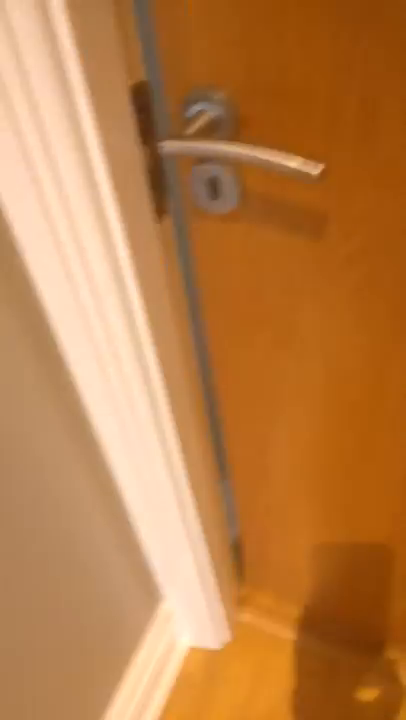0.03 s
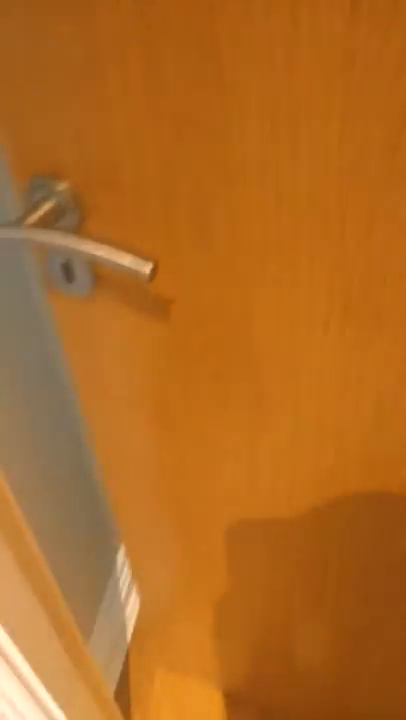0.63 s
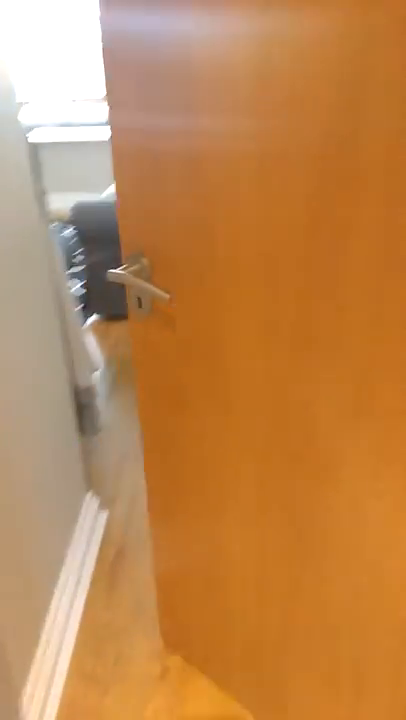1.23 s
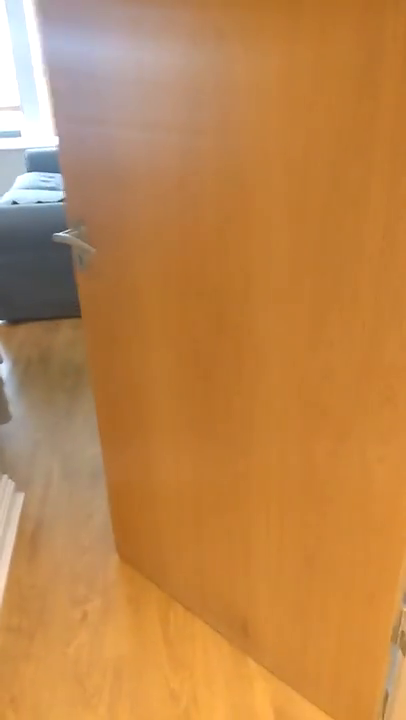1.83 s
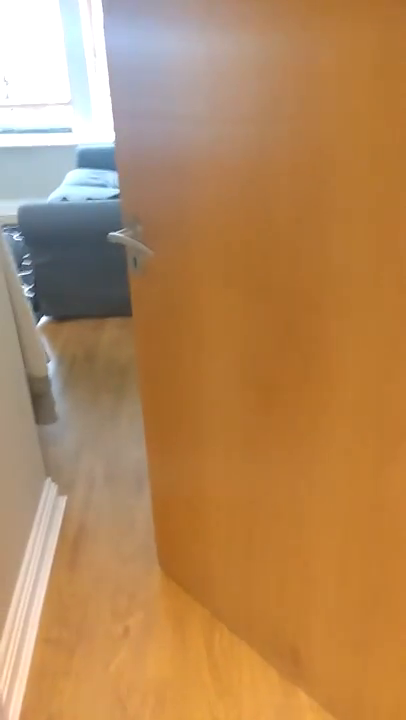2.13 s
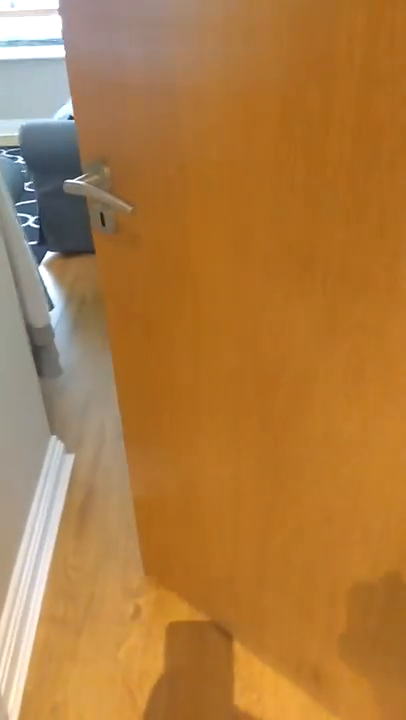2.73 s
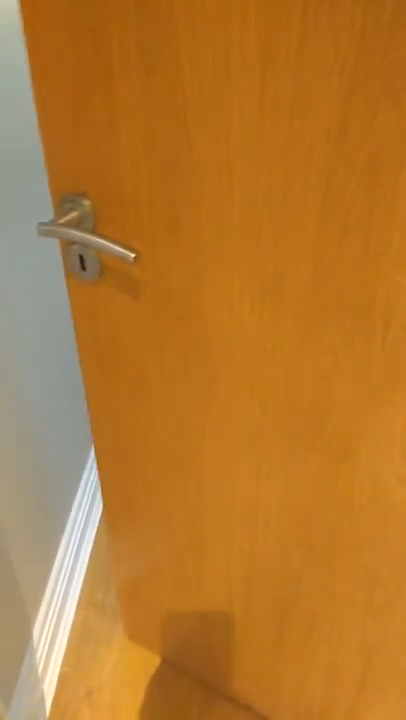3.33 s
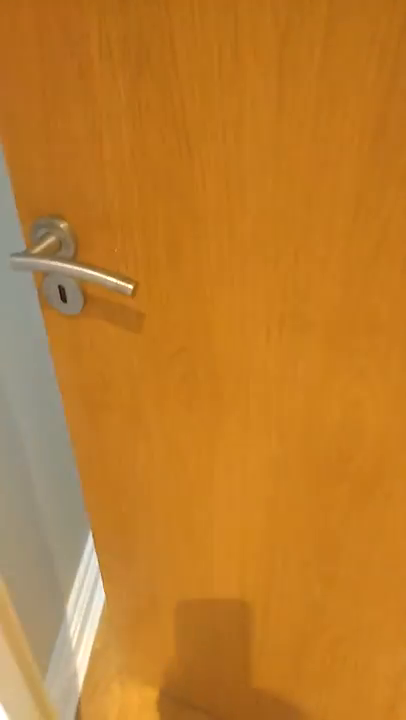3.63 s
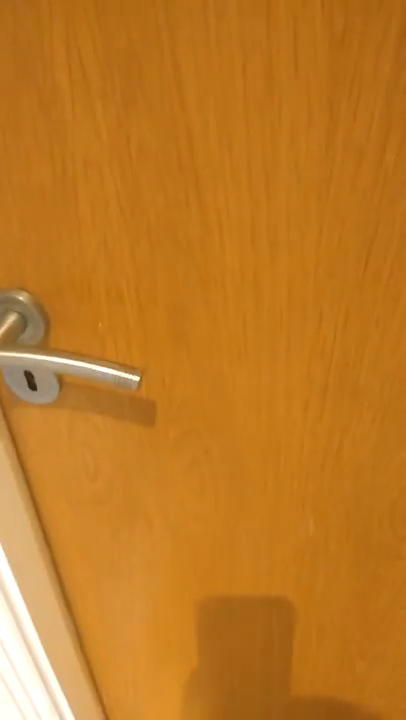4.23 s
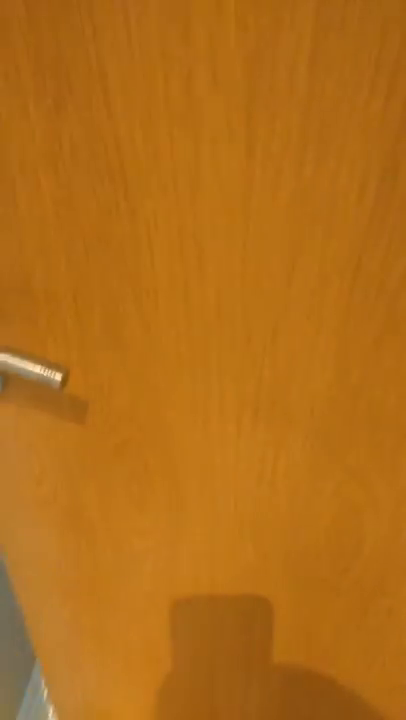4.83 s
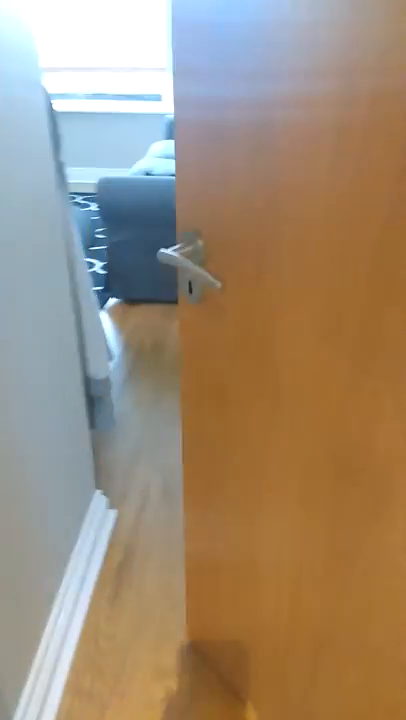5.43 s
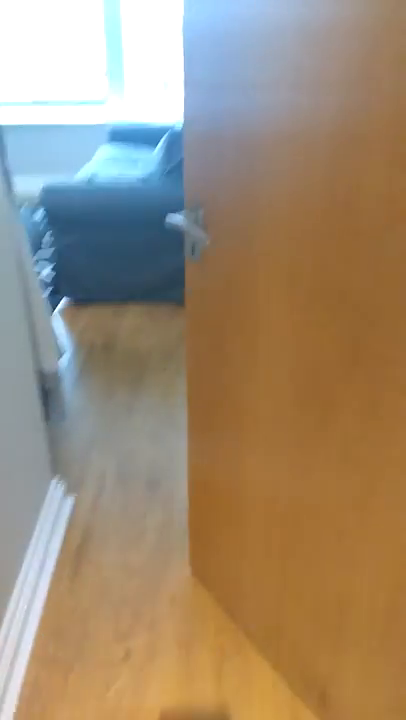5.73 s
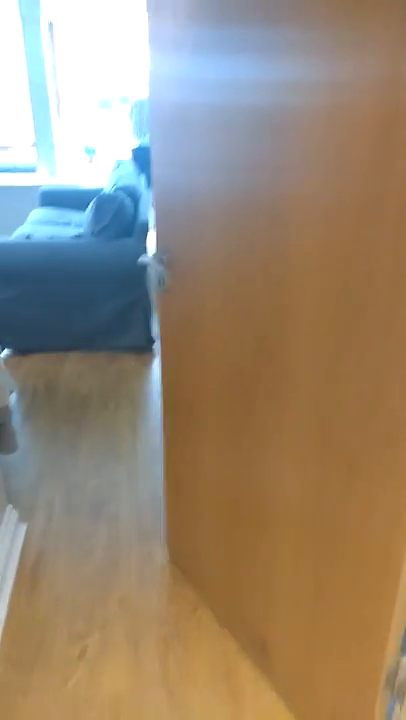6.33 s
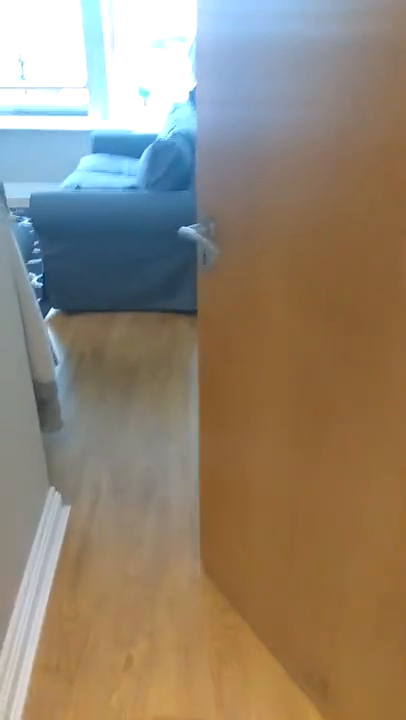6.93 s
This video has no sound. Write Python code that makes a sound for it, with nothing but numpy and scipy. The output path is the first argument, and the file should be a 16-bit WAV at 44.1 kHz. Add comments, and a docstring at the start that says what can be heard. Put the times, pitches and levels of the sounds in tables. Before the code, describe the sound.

In a quiet hallway, a door handle clicks and the wooden door knocks lightly. Its dry hinge gives a squeal that falls into a slow rattle. The door is pulled shut with a sharp latch snap, then clicks open and creaks again the same way. A faint appliance hum sits behind it, dropping while the door is closed. A sleeve swishes softly, and fingers bump the hand-held microphone around the second creak.

```python
"""An appliance hums beyond a wooden hallway door. The handle clicks, the door is pushed open, and its dry
hinge sticks and slips: a squeal that falls into a rattle as the door slows. Near 4 s the door is pulled
shut with a puff of air, the latch snaps and the hum grows fainter. A second later the latch clicks again,
the hum returns and the hinge creaks once more while fingers bump the hand-held camera.
A sleeve swishes now and then throughout."""
import sys
import numpy as np
from scipy import signal
from scipy.fft import rfft, irfft, next_fast_len
from scipy.io import wavfile
from scipy.ndimage import uniform_filter1d, map_coordinates

SR = 44100
rng = np.random.default_rng(int(sys.argv[2]) if len(sys.argv) > 2 else 0)


def write(x):
    x = np.atleast_2d(x).T
    wavfile.write(sys.argv[1], SR, np.round(np.clip(x, -1, 1) * 32767).astype(np.int16))


N = 313110
NOW = np.arange(N) / SR


def amp(db):
    """Decibels to gain."""
    return 10 ** (np.asarray(db) / 20)


def unit(x):
    """Scale to rms 1."""
    return x / np.sqrt(np.mean(x ** 2) + 1e-20)


def along(points, hz):
    """Read (Hz, value) points on a log frequency axis."""
    f, v = np.transpose(points)
    return np.interp(np.log(hz + 1), np.log(f + 1), v)


def curve(points):
    """Join (seconds, value) points into one value per sample."""
    return np.interp(NOW, *np.transpose(points))


def wobble(rate):
    """A smooth random curve, rate knots a second."""
    return map_coordinates(rng.standard_normal(int(N * rate / SR) + 4), [NOW * rate])


def filtered(x, response):
    """Filter x by a complex response of frequency."""
    n = x.shape[-1]
    m = next_fast_len(n + SR // 8)
    return irfft(rfft(x, m) * response(np.fft.rfftfreq(m, 1 / SR)), m)[..., :n]


def eq(x, points):
    """Colour x with a curve of (Hz, dB) points."""
    return filtered(x, lambda f: amp(along(points, f)))


def resonance(f, hz, width):
    """Response of one damped mode."""
    return 1j * f * width / (hz * hz - f * f + 1j * f * width)


def add(track, s, x):
    """Mix x into the track at s seconds."""
    part = track[..., round(s * SR):][..., :x.shape[-1]]
    part += x[..., :part.shape[-1]]


# Stereo image of diffuse sound. Each row: frequency in Hz, left-right correlation.
STEREO_LIKENESS = [(60, 0.18), (130, 0.11), (290, 0.14), (640, 0.78), (1400, 0.93), (3000, 0.81),
                   (8000, 0.81), (14000, 0.06)]

def mid_side(f):
    """Mid and side gains that make noise partly alike in both ears."""
    angle = np.arccos(np.clip(along(STEREO_LIKENESS, f), -1, 1)) / 2
    return np.array([np.cos(angle), np.sin(angle)])


def stereo_noise(colour):
    """Diffuse noise of rms 1, coloured by (Hz, dB) points."""
    mid, side = filtered(rng.standard_normal((2, N)), lambda f: amp(along(colour, f)) * mid_side(f))
    return unit(np.array([mid + side, mid - side]))


# The hallway's tail. Each row: frequency in Hz, t60 in seconds.
HALL_DECAY = [(150, 0.71), (600, 0.69), (1500, 0.67), (4000, 0.74), (8000, 0.68), (13000, 0.35)]

def hallway(x, tail_db, walls_db, walls_t60=0.09):
    """Direct sound, scattered echoes of the close walls and a longer tail."""
    hz, t, noise = signal.stft(rng.standard_normal((2, SR * 3 // 4)), SR, nperseg=256)
    noise = noise * mid_side(hz)[..., None]

    def decay(db, t60):
        wash = signal.istft(noise * amp(-60 * t / t60), SR, nperseg=256)[1]
        return amp(db) * wash / np.linalg.norm(wash)
    mid, side = decay(tail_db, along(HALL_DECAY, hz)[:, None]) + decay(walls_db, walls_t60)
    echoes = np.pad([mid + side, mid - side], ((0, 0), (SR // 300, 0)))  # pre-delay
    x = np.atleast_2d(x)
    return x + signal.fftconvolve(x, echoes, axes=1)[:, :N]


# The bed of air. Each row: frequency in Hz, relative level in dB.
AIR_COLOUR = [(20, -49), (44, -6), (70, -15), (110, -10), (150, -2), (240, -5.5), (340, -10), (700, -9),
              (1500, -14.5), (2500, -18.5), (3600, -22), (5000, -27.5), (9000, -37.5), (15000, -40)]
# The appliance's tones. Each row: pitch in Hz, relative level in dB.
HUM_TONES = [(100.2, -48.5), (155, -49.5), (200, -54), (243, -49.5), (296, -56), (565.2, -52), (684, -53.5)]

def room_beyond(open_db=-37.5, shut_db=-46.5, shut_at=4.04, shutting_s=0.22, open_at=4.9, opening_s=0.89):
    """Air noise and a slightly unsteady appliance hum, both fainter while the door is shut."""
    hum = np.zeros((2, N))
    for hz, db in HUM_TONES:
        phase = 2 * np.pi * hz * NOW + 0.2 * wobble(7)
        hum += amp(db + 1.8 * wobble(6)) * np.sin(phase + np.array([[.4], [-.4]]))
    air = amp(-2.5 + 0.64 * wobble(9)) * stereo_noise(AIR_COLOUR)
    shut = np.clip((NOW - shut_at) / shutting_s, 0, 1) - np.clip((NOW - open_at) / opening_s, 0, 1)
    return amp(open_db + (shut_db - open_db) * shut) * (air + amp(39) * hum)


# Sleeve swishes. Each row: time of the peak in seconds, level in dB.
SWISHES = [(.02, -48), (.76, -45), (1.47, -48), (3.05, -52.5), (5.58, -58), (6.7, -48.5)]
# The cloth's hiss. Each row: frequency in Hz, relative level in dB.
CLOTH_COLOUR = [(1500, -11), (3300, 4), (6000, -5), (9000, -5), (15000, -14)]

def sleeve(rise_db_per_s=43, fall_db_per_s=36):
    """Cloth rustle swells and fades with each move of the arm."""
    swishes = [db - np.maximum(rise_db_per_s * (s - NOW), fall_db_per_s * (NOW - s)) for s, db in SWISHES]
    return amp(np.max(swishes, axis=0)) * stereo_noise(CLOTH_COLOUR)


# The puff as the door shuts. Each row: time in seconds, level in dB.
PUFF_ENVELOPE = [(3.95, -82), (4.06, -45), (4.2, -56), (4.3, -56), (4.42, -84)]

def draught():
    """The closing leaf presses a slow rumble of air through the frame."""
    rumble = stereo_noise([(15, -18), (40, 2), (60, -3), (110, -27), (300, -64)])[0]
    return amp(curve(PUFF_ENVELOPE)) * rumble


# Shifts of the grip. Each row: start in seconds, end in seconds, tap level in dB.
GRIP_SHIFTS = [(0.664, .7, -26), (5.65, 5.83, -20), (6.223, 6.39, -21), (6.895, 6.98, -28)]

def finger_taps(per_s=36, hz=127, spread_db=0.5, spread_octaves=0.22):
    """Light taps, loosely spaced through each shift of the grip, as (seconds, dB, Hz) rows."""
    taps = []
    for start, end, db in GRIP_SHIFTS:
        times = np.arange(start, end, 1 / per_s)
        for s, (late, soft, pitch) in zip(times, rng.standard_normal((40, 3))):
            taps.append((s + late / per_s / np.pi, db - spread_db * soft, hz * 2 ** (spread_octaves * pitch)))
    return taps


# Firm bumps on the camera. Each row: time of the peak in seconds, level in dB, pitch in Hz.
FIRM_BUMPS = [(.718, -19, 102), (5.212, -21, 122), (5.687, -10, 160), (5.699, -13, 135), (5.721, -13, 237),
              (5.768, -16, 141), (6.201, -14, 155), (6.415, -7.5, 175), (6.449, -17, 151)]

def camera_bumps(cycles=0.75, grip_s=0.011):
    """Fingers flex the camera case: brief low pushes, opposite at the two ports, with a little rubbing."""
    pushes, grip = np.zeros((2, N))
    t = np.arange(-SR // 10, SR // 10) / SR
    for s, db, hz in FIRM_BUMPS + finger_taps():
        envelope = amp(db) / np.cosh(np.clip(2 * hz * t / cycles, -20, 20))
        add(pushes, s + t[0], envelope * np.cos(2 * np.pi * hz * t))
        add(grip, s + t[0], amp(db) * np.exp(-abs(t) / grip_s))
    rub = grip * stereo_noise([(25, -28), (60, -7), (130, 11), (300, -3), (600, -27), (1500, -77)])
    return (pushes + amp(-16) * rub[0]) * np.array([[.92], [-1]]) + amp(-25) * rub[1]


# Dull knocks of door and floor.
# Each row: start in seconds, level in dB, pitch in Hz, t60 in seconds, left over right in dB.
WOOD_KNOCKS = [(.049, -26.5, 380, 0.051, 0), (.415, -29, 302, 0.045, 5), (.826, -30.5, 307, 0.14, 3),
               (1.0455, -21.5, 402, 0.037, -5.5), (1.058, -25.5, 350, 0.035, 4),
               (4.027, -22.5, 331, 0.058, 3), (4.03, -32.5, 705, 0.11, 1), (4.057, -24.5, 190, 0.043, -1),
               (4.296, -41, 379, .096, 0), (5.058, -32, 870, 0.046, 1), (5.08, -33.5, 351, .08, -4),
               (5.325, -38.5, 409, .08, 1), (5.715, -28, 264, 0.076, 1), (6.411, -26, 250, 0.045, 4),
               (6.573, -28.5, 386, 0.12, 1)]

def knocks(thud_db=-5):
    """Soft blows on wood: a low mode inside a quickly dying thud."""
    out, t = np.zeros((2, N)), np.arange(SR // 3) / SR
    for s, db, hz, t60, pan_db in WOOD_KNOCKS:
        thud = unit(filtered(rng.standard_normal(len(t)), lambda f: resonance(f, hz, width=hz) ** 2))
        blow = amp(db - 60 * t / t60) * (amp(thud_db) * thud + np.sin(2 * np.pi * hz * t))
        add(out, s, blow * amp([[pan_db / 2], [-pan_db / 2]]))
    return hallway(out, tail_db=-5, walls_db=-1.5)


# Latch and handle contacts.
# Each row: start in seconds, rattle level in dB, tick level in dB, rattle t60 in seconds.
LATCH_HITS = [(0.05, -17.5, -16, 0.031), (0.446, -19.5, -46, 0.044), (0.592, -32, -59.5, 0.19),
              (0.822, -26, -48, 0.1), (3.88, -28.5, -37.5, 0.12), (4.022, -27, -45, 0.03),
              (4.144, -12, -15, 0.042), (5.056, -26.5, -41.5, 0.024)]
# The woody rattle and the bright tick. Each row: frequency in Hz, relative level in dB.
LEAF_COLOUR = [(150, -6), (500, -16.5), (850, -5.5), (1150, 2), (1500, -1.5), (1950, 0.5), (2500, -7),
               (3500, -19.5), (5000, -19.5), (9000, -51)]
STEEL_COLOUR = [(1500, -11), (3000, 2), (5200, -1.5), (6900, -4.5), (9100, -8.5), (10500, -9.5),
                (15000, -22)]

def latch(tick_t60=0.0084, rattle_rise_s=0.00045):
    """Each contact is a short steel tick, then a rattle of the door leaf's dense modes."""
    ticks, rattles = np.zeros((2, N))
    t = np.arange(SR // 3) / SR
    for s, rattle_db, tick_db, rattle_t60 in LATCH_HITS:
        steel = unit(eq(rng.standard_normal(len(t)), STEEL_COLOUR))
        wood = unit(eq(rng.standard_normal(len(t)), LEAF_COLOUR))
        add(ticks, s, amp(tick_db - 60 * t / tick_t60) * steel)
        add(rattles, s, amp(rattle_db - 60 * t / rattle_t60) * (1 - np.exp(-t / rattle_rise_s)) * wood)
    return hallway(ticks, tail_db=-8, walls_db=-3) + hallway(rattles, tail_db=-1, walls_db=-17.5)


# Ring of frame and strike plate. Each row: pitch in Hz, relative level in dB, t60 in seconds.
STRIKE_MODES = [(1190, -26, .3), (1460, -21.5, .14), (6850, -22, 0.016), (9100, -10, 0.0063)]

def bolt(start_s=4.1423):
    """The bolt springs home: the frame rings under the short bright ping of the strike plate."""
    out, t = np.zeros(N), np.arange(SR // 20) / SR
    for hz, db, t60 in STRIKE_MODES:
        add(out, start_s, amp(db - 60 * t / t60) * np.sin(2 * np.pi * hz * t))
    return hallway(out, tail_db=-19, walls_db=-18) * np.array([[2], [-2]])


def slip_rate(glide):
    """Slips per second: friction slows the door by equal ratios in equal times."""
    return np.exp(curve([(s, np.log(hz)) for s, hz in glide]))


def roughness(rate, at_rest=0.95, smoothing_hz=225):
    """Slow slips are uneven, fast ones lock into a squeal."""
    return at_rest * np.exp(-rate / smoothing_hz)


def stroke_envelope(glide, swell_db, edge_s=0.019, swell_s=0.15, stall_hz=162):
    """A stroke's shape in dB: abrupt ends, a swell as the pin bites, a fade as the hinge stalls."""
    start, end = glide[0][0], glide[-1][0]
    edge = np.clip(1 - np.minimum(NOW - start, end - NOW) / edge_s, 0, 1)
    swell = np.clip(1 - (NOW - start) / swell_s, 0, 1)
    stall_octaves = np.maximum(np.log2(stall_hz / slip_rate(glide)), 0)
    return -26 * edge - swell_db * swell - 24 * stall_octaves


def slips(glide, db, scatter=0.14, spread_db=5.5, waver=0.007):
    """One kick each time the pin lets go; slow slips vary in timing and force."""
    rate = slip_rate(glide)
    moving = (NOW > glide[0][0]) & (NOW < glide[-1][0])
    count = np.cumsum(rate * (1 + waver * wobble(70)) * moving) / SR
    due = np.interp(np.arange(1, int(count[-1])), count, np.arange(N))
    i = due.astype(int)
    late, force = roughness(rate[i]) * np.clip(rng.standard_normal((2000, 2)), -2, 2)[:len(i)].T
    period = SR / rate[i]
    at = due + scatter * late * period
    size = amp(db[i] + spread_db * force) * np.sqrt(period)
    # a windowed sinc places each kick between samples, keeping the squeal clean
    samples = at.astype(int)[:, None] + np.arange(-7, 9)
    offset = samples - at[:, None]
    kicks = size[:, None] * np.sinc(offset) * np.cos(np.pi * offset / 16) ** 2
    return np.bincount(samples.ravel(), kicks.ravel(), N)[:N]


# Resonances of hinge and leaf. Each row: pitch in Hz, width in Hz, relative level in dB.
DOOR_MODES = [(358, 127, -9), (590, 94, -7.5), (927, 232, -4.5), (1350, 188, 3), (1795, 271, 3),
              (2070, 160, -19.5), (2025, 74, -10.5), (3360, 610, -12), (3715, 415, -11), (5310, 800, -22.5)]
# What the door sends into the air. Each row: frequency in Hz, gain in dB.
DOOR_RADIATION = [(60, -30), (250, 0.5), (6500, -2.5), (9000, -13), (15000, -24)]

def door_body(f):
    """Response of hinge plate and door leaf: damped modes of alternating sign, radiated into the air."""
    modes = sum((-1) ** k * amp(db) * resonance(f, hz, width)
                for k, (hz, width, db) in enumerate(DOOR_MODES))
    return modes / np.sqrt(np.mean(abs(modes) ** 2)) * amp(along(DOOR_RADIATION, f))


# Pitch glides of the hinge. Each row: time in seconds, slips per second.
FIRST_CREAK = [(1.533, 1118), (1.615, 1080), (1.668, 950), (1.681, 860), (1.722, 808), (1.74, 645),
               (1.79, 520), (1.99, 68)]
AFTER_CREAK = [(2.115, 391), (2.165, 414)]
FAINT_SQUEAL = [(5.62, 1210), (5.72, 1177)]
SECOND_CREAK = [(5.872, 1115), (5.942, 1062), (5.956, 997), (6.01, 915), (6.09, 815), (6.112, 688),
                (6.185, 550), (6.43, 60)]
# Strokes of the hinge. Each row: glide, then in dB the relative level, swell, dry scrape,
# sizzle of the scrape, boom of the leaf and shrillness.
HINGE_STROKES = [(FIRST_CREAK, -16.5, 8.1, -22, 5.3, 0, 2.45), (AFTER_CREAK, -29.5, 0, -32, 0, 7.6, 0),
                 (FAINT_SQUEAL, -39, 0, -45, 0, 4.7, -15), (SECOND_CREAK, -18.5, 0, -23, -9, 2.14, 0)]
# The gritty scrape. Each row: frequency in Hz, gain in dB.
SCRAPE_COLOUR = [(2200, -25), (3300, 11.5), (5000, 12.5), (7000, 0.5), (9000, -2.5), (12000, -9.5),
                 (15000, -11)]

def hinge():
    """The dry hinge sticks and slips, ringing its plate and the leaf; rough, slow slips also scrape."""
    kicks, scrape = np.zeros((2, N))
    for glide, level_db, swell_db, scrape_db, sizzle_db, boom_db, shrill_db in HINGE_STROKES:
        train = slips(glide, level_db + stroke_envelope(glide, swell_db))
        kicks += eq(train, [(1150, boom_db), (1500, 0), (2500, shrill_db)])
        # every slip scrapes over fresh grains of metal for about two milliseconds
        energy = uniform_filter1d(train ** 2 * roughness(slip_rate(glide)), size=90)
        grains = np.sqrt(np.abs(energy)) * rng.standard_normal(N)
        scrape += amp(scrape_db) * eq(grains, [(5500, 0), (13000, sizzle_db)])
    creak = amp(-4) * filtered(kicks, door_body) + eq(scrape, SCRAPE_COLOUR)
    return hallway(creak, tail_db=-4.5, walls_db=-2.5)


# Lag of the left microphone port behind the right. Each row: frequency in Hz, delay in seconds.
PORT_LAG = [(1380, 0), (2000, .00019), (2500, .0002), (3300, .00028), (5000, .0003), (7600, .00033),
            (12700, .000355)]

def microphone_ports(x):
    """The right port hears a little louder, and treble reaches it first."""
    side = np.array([[-1], [1]])
    lean_db = [(700, 1.0), (1300, 0.87), (2400, 1.3)]
    leaning = filtered(x, lambda f: amp(side * along(lean_db, f)))
    return filtered(leaning, lambda f: np.exp(1j * np.pi * f * along(PORT_LAG, f) * side))


def scene():
    """Door, room and sleeve reach the ports through the air; the bumps go straight into the camera."""
    door = hinge() + latch() + bolt() + knocks()
    airborne = door + room_beyond() + sleeve() + draught()
    return microphone_ports(airborne) + camera_bumps()


def record(dry):
    """The camera keeps nothing above its band limit."""
    return filtered(dry, lambda f: f < 15500)


dry = scene()
out = record(dry)
write(out)
```